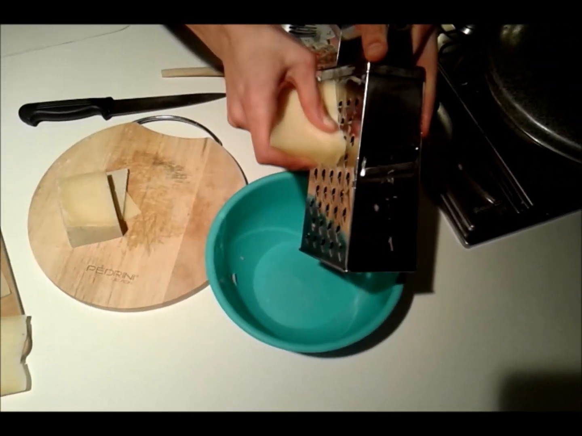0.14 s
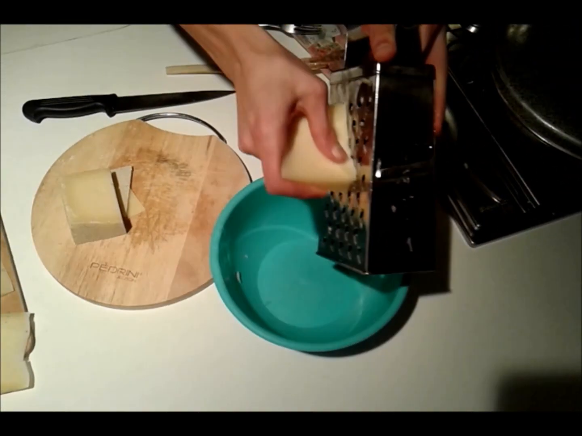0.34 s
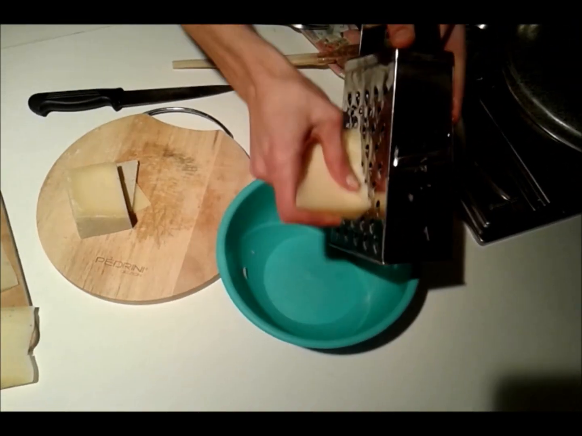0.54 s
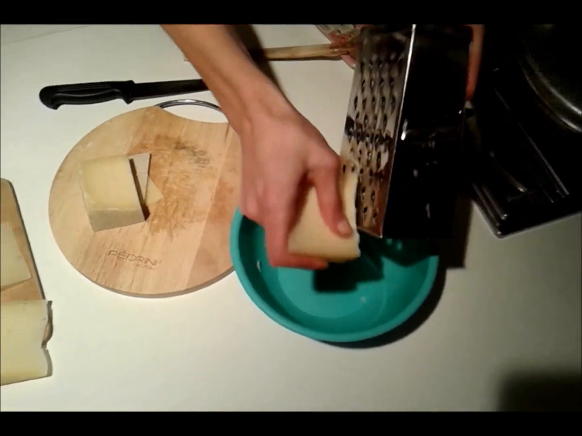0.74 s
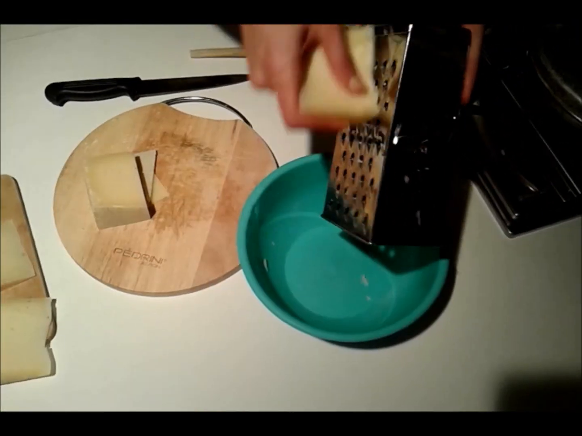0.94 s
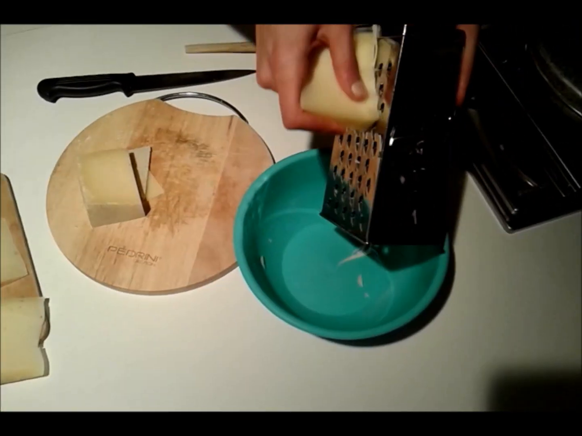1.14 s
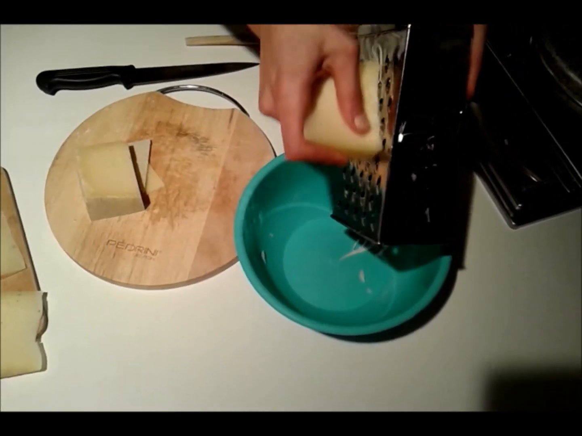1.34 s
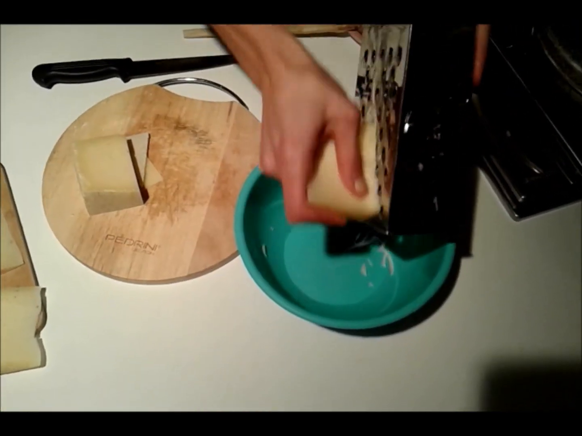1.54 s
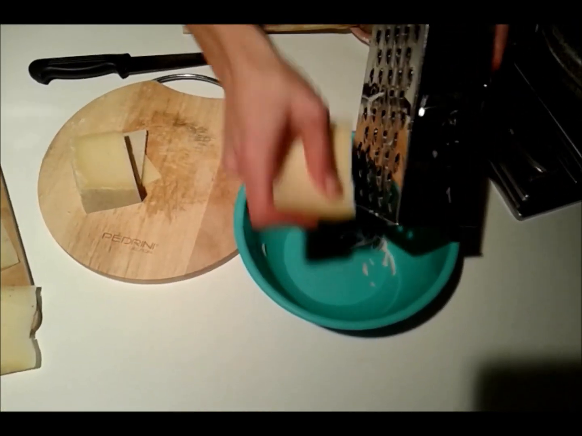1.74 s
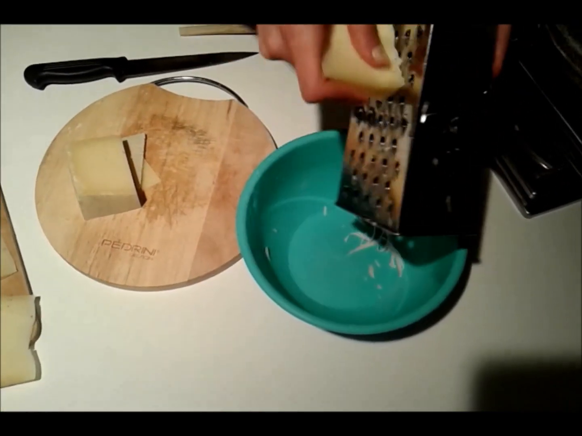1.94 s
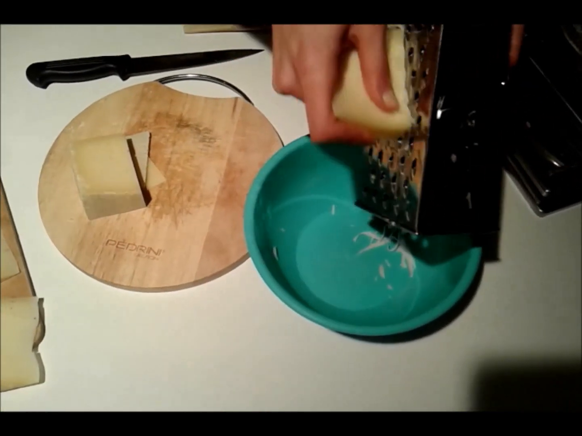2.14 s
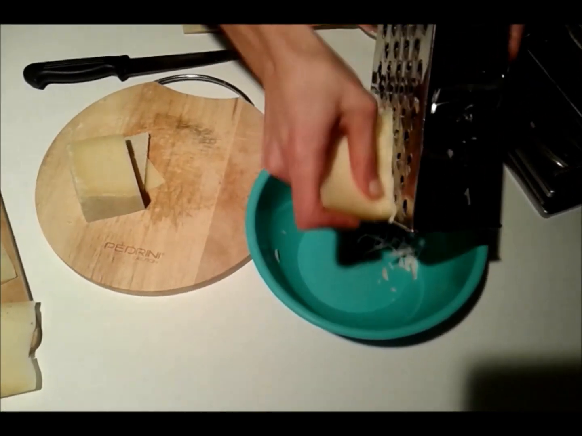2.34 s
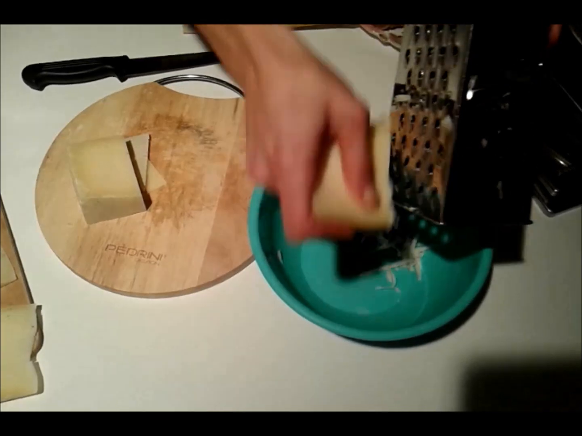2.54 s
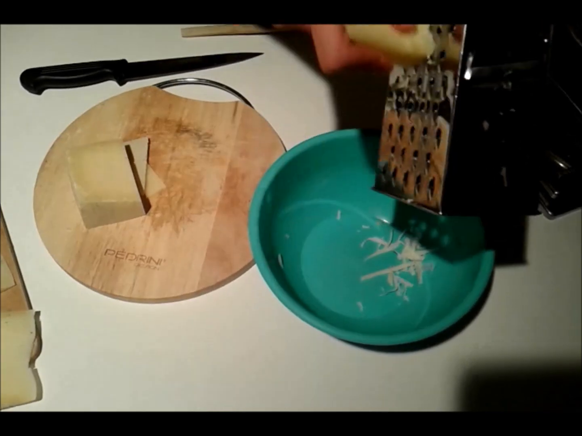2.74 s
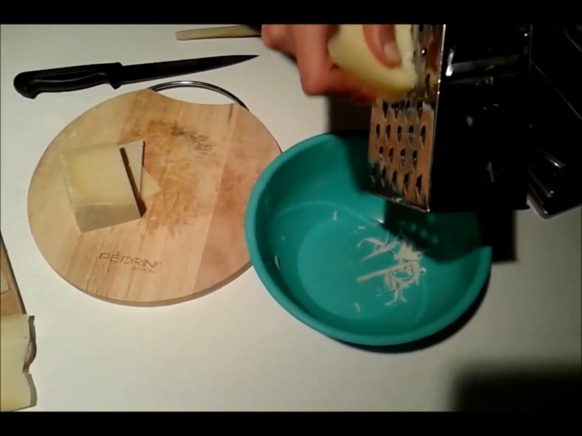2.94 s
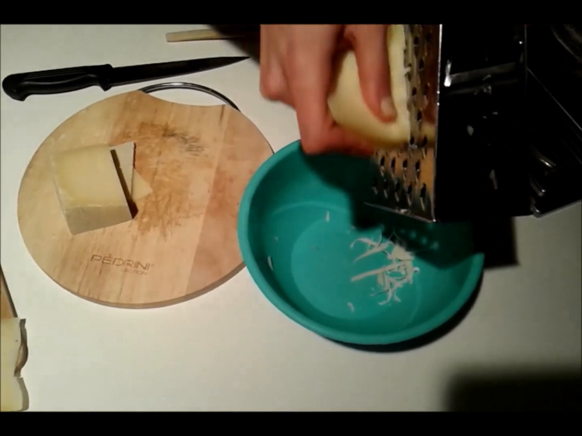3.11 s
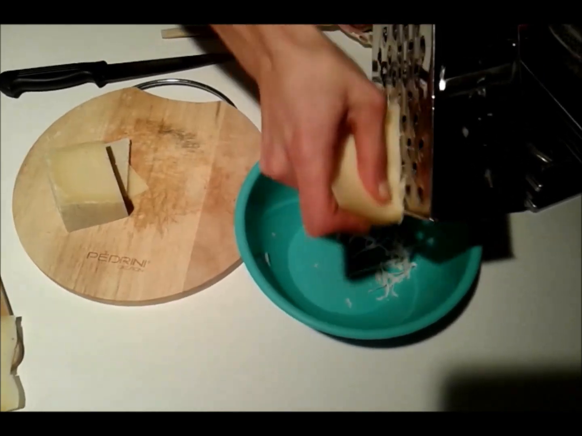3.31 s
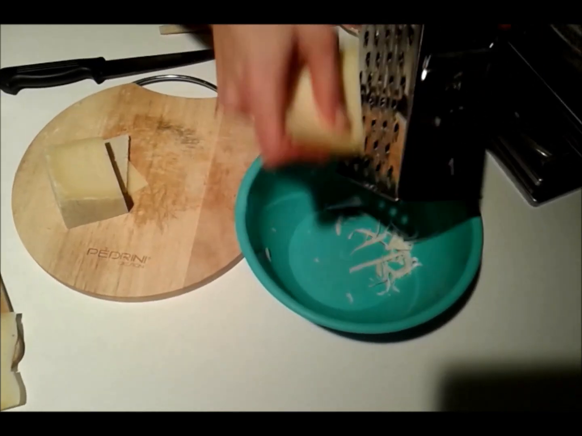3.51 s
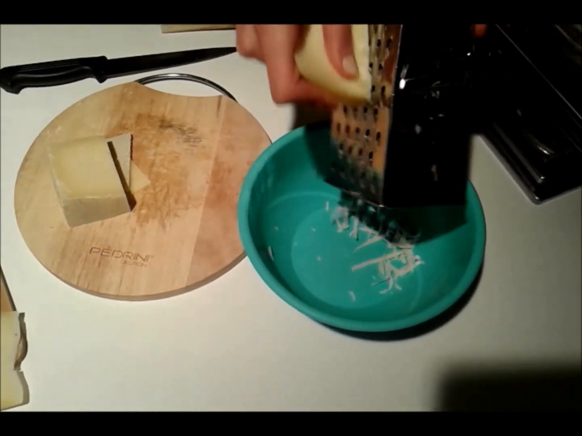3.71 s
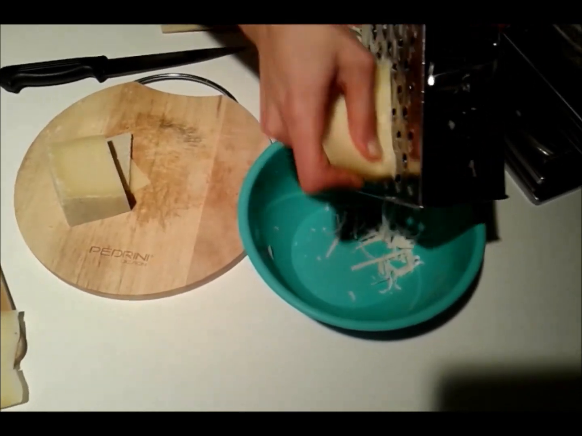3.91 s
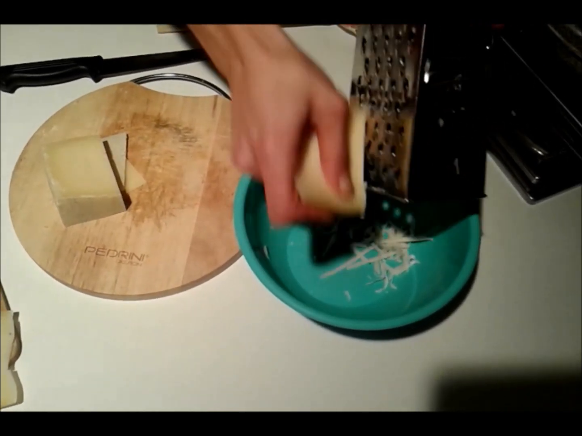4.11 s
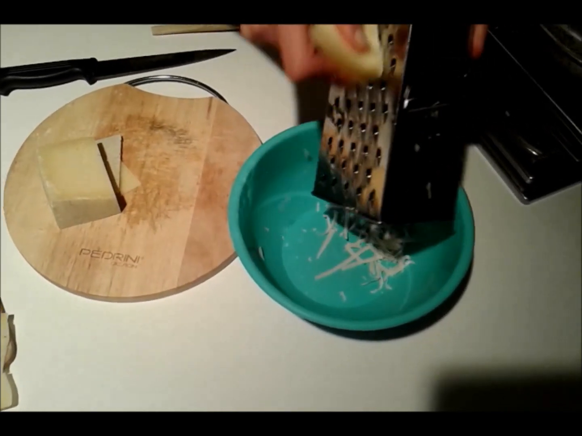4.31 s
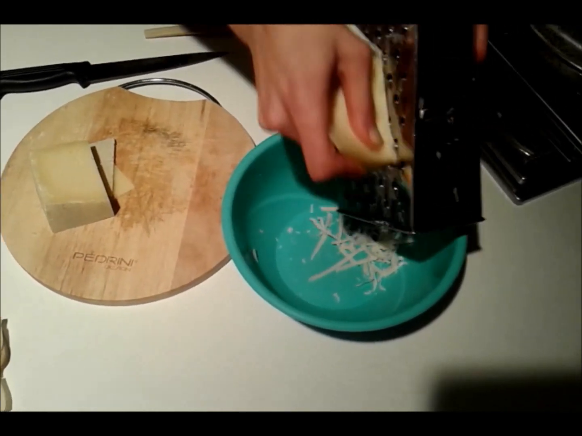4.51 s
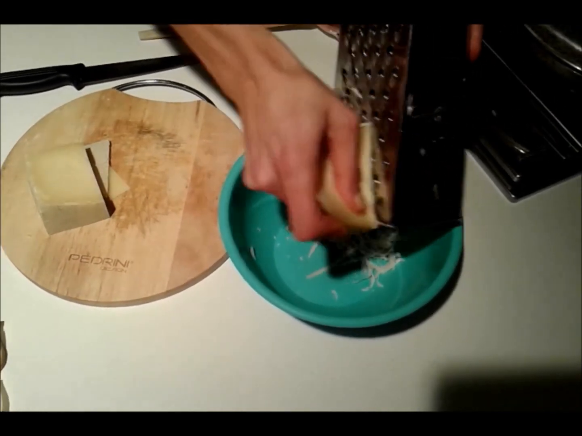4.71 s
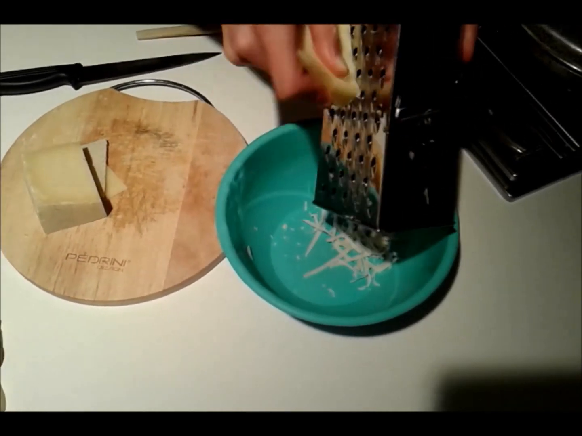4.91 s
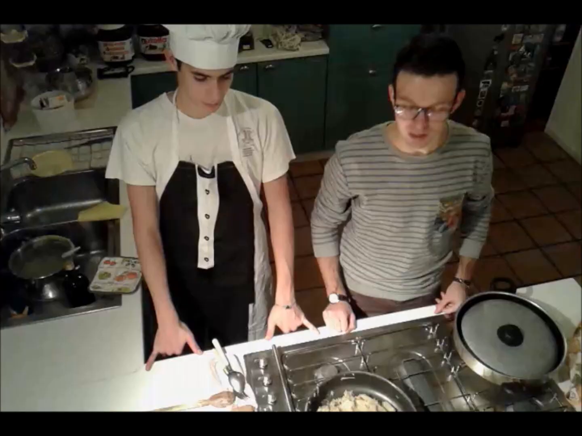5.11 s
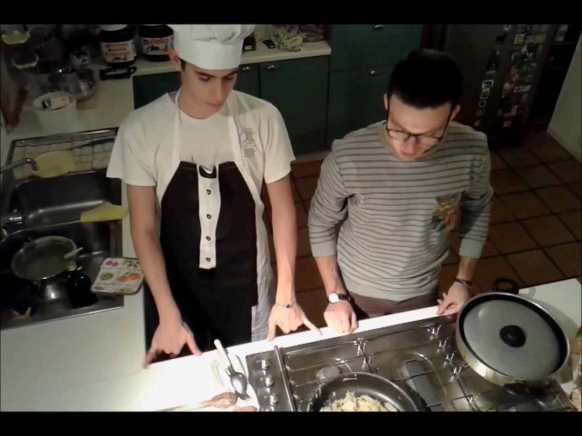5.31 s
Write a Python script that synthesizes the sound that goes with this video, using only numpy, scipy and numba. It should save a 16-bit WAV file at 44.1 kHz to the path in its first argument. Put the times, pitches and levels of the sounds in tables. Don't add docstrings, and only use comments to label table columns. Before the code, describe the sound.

A block of hard cheese is dragged down a steel box grater in short uneven strokes. Grainy scraping is broken by bright snaps and tiny clicks, while the hollow metal box knocks dully. Small hard-walled kitchen with faint hum; a close, thin, treble-heavy microphone gates the quiet gaps. The last stroke is dense, then sound cuts off.

```python
import sys
import numpy as np
from scipy import signal
from scipy.fft import rfft, irfft
from scipy.io import wavfile
from numba import njit

SR = 44100
rng = np.random.default_rng(int(sys.argv[2]) if len(sys.argv) > 2 else 0)


def boost_factor(decibels):
    exponent = np.asarray(decibels, float) / 20
    return 10 ** exponent


def int16_out(signal):
    q = np.round(np.clip(np.atleast_2d(signal).T, -1, 1) * 32767)
    wavfile.write(sys.argv[1], SR, q.astype(np.int16))


N = 240477


def colour(x, points):
    hz, db = np.transpose(points)
    bins_hz = np.fft.rfftfreq(8192, 1 / SR)
    log_gain = np.interp(np.log(bins_hz + 1), np.log(hz), db) * np.log(10) / 20
    cepstrum = irfft(log_gain)
    cepstrum[1:4096] *= 2
    cepstrum[4097:] = 0
    impulse = irfft(np.exp(rfft(cepstrum)))
    return signal.fftconvolve(x, impulse)[:len(x)]


def band(x, lo_hz, hi_hz):
    return signal.sosfilt(signal.butter(2, [lo_hz, hi_hz], "band", fs=SR, output="sos"), x)


def unit(x):
    return x / np.sqrt(np.mean(x ** 2))


def fade(t, t60):
    return boost_factor(-60 * t / t60)


def seconds(length_s):
    return np.arange(int(length_s * SR)) / SR


def add(out, s, x):
    i = int(s * SR)
    out[i:i + len(x)] += x[:N - i]


def grit(rate_hz, spread_db, smear_s):
    size = np.minimum(rng.exponential(size=N), 4)
    slips = (rng.random(N) < rate_hz / SR) * boost_factor(spread_db * size)
    power = signal.lfilter([1], [1, -np.exp(-1 / (smear_s * SR))], slips ** 2)
    return unit(rng.standard_normal(N) * np.sqrt(power))


# (frequency [Hz], density [dB per Hz])
HUM_TONE = [(15, -14.5), (30, -7.5), (70, -16), (160, -5), (220, -14), (300, -6), (480, -7), (640, -1.5),
            (790, -8), (930, -13), (1600, -19), (2700, -14), (3900, -17.5), (4700, -14), (8600, -10),
            (11000, -15), (15200, -16.5), (16500, -39.5)]


def kitchen():
    return boost_factor(-63.5) * unit(colour(rng.standard_normal(N), HUM_TONE))


def room(x):
    t = seconds(0.4)
    tail = rng.standard_normal(len(t)) * fade(t, 0.45) * (t > 0.004)
    tail = tail / np.sqrt(np.sum(tail ** 2))
    return boost_factor(-11) * signal.fftconvolve(x, tail)[:N]


# (time [s], frequency [Hz], level
# [dB], t60 [s])
LONE_RINGS = [(1.48, 150, -64, .2), (1.62, 150, -62, .2), (1.71, 295, -56, .2), (2.5, 390, -65, .5),
              (3.17, 300, -60, .2), (.7, 3800, -58, .15), (.13, 663, -57.5, .3), (.16, 660, -59, .5),
              (0.141, 330, -64, 0.49), (.02, 1930, -70, 1.5), (1.09, 520, -50, .35), (.86, 2140, -52, .2),
              (.29, 1430, -62, .1), (1.232, 2690, -44.5, .1), (1.232, 782, -48, .05),
              (4.802, 1352, -38.5, .08), (.49, 537, -49, 0.3), (0.683, 3220, -39.5, 0.078),
              (.684, 3700, -54, 0.051), (1.618, 1430, -40, 0.05), (2.064, 362.6, -36.5, 0.089),
              (2.441, 2850, -46, 0.051), (2.53, 1085, -42, 0.088), (2.549, 2870, -40.5, 0.024),
              (2.811, 3100, -47.5, 0.034), (3.703, 2200, -48, 0.055), (3.745, 533, -32, 0.13),
              (4.801, 1960, -45.5, 0.098), (5.013, 3200, -36, 0.05), (2.29, 1440, -56.5, 0.4),
              (4.385, 381, -39, 0.13), (5.02, 1085, -41.5, 0.16)]


def rings():
    t = seconds(0.6)
    out = np.zeros(N)
    for s, hz, db, t60 in LONE_RINGS:
        build_up = np.minimum(t / (0.078 * t60), 1)
        add(out, s, boost_factor(db) * np.sin(2 * np.pi * hz * t) * fade(t, t60) * build_up)
    return out


# (time [s], peak [dB], upper modes [dB re peak],
# low mode under the grip [Hz], upper mode under the grip [Hz])
BOX_KNOCKS = [(.498, -60, 8, 530, 1045), (.678, -58, 7, 502, 1407), (.806, -50.5, 4, 537, 1060),
              (.838, -37.5, 2.5, 548, 1065), (1.009, -50, -9, 633, 800), (1.072, -30.5, -5.5, 582, 1067),
              (1.23, -38.5, -19, 752, 790), (1.616, -45, 8, 512, 1430), (1.712, -43, -4, 577, 1410),
              (1.798, -39, -23, 780, 780), (2.066, -34, -8.5, 488, 1080), (2.289, -53.5, 7, 552, 1445),
              (2.37, -52, 5, 546, 1404), (2.857, -57, -16, 496, 1080), (3.336, -44, 8, 485, 1000),
              (3.483, -54, -4, 537, 1020), (3.732, -28.5, .3, 567, 927), (4.108, -51.5, -21.5, 480, 1460),
              (4.384, -30, -4, 528, 1100), (4.569, -50.5, -3, 490, 790), (4.677, -37, -2.5, 473, 1005),
              (4.803, -36, 4, 374, 1330), (4.886, -51, 2.5, 677, 1110), (5.019, -26.5, -2.5, 502, 1097)]
# (frequency [Hz], level [dB])
LOW_BODY = [(305, -7.5), (365, -9.5), (395, -3), (465, -6.5), (507, 2.5), (532, -0.5), (566, -1.5),
            (690, -1), (760, -1.5)]
# (frequency [Hz], level [dB])
HIGH_BODY = [(850, -1), (910, -9), (990, -5), (1075, 2), (1105, -12.5), (1260, -6.5), (1375, -4),
             (1464, -2.5), (1700, -5.5)]


def knocks():
    t = seconds(0.3)
    out = np.zeros(N)
    chance = rng.standard_normal((len(BOX_KNOCKS), 44))
    thud = unit(band(rng.standard_normal(N), 150, 2450))
    for (s, db, upper_db, grip_hz, upper_hz), draw in zip(BOX_KNOCKS, chance):
        t60 = 0.095 + 0.012 * max(-44 - db, 0)
        modes = [(grip_hz, 4), (upper_hz, upper_db + 4.5)] + LOW_BODY
        modes = modes + [(hz, level + upper_db) for hz, level in HIGH_BODY]
        ring = np.zeros(len(t))
        for (hz, level), level_draw, pitch_draw in zip(modes, draw[::2], draw[1::2]):
            tone = np.sin(2 * np.pi * hz * (1 + pitch_draw / 100) * t)
            ring += boost_factor(level + 2 * level_draw) * tone * fade(t, t60 * (550 / hz) ** 0.5)
        thud_here = np.roll(thud, -int(s * SR))[:len(t)]
        ring += boost_factor(-2.5) * thud_here * fade(t, 0.61 * t60)
        add(out, s, boost_factor(db - 10.5) * ring * np.minimum(t / 0.0044, 1))
    return out


# (time [s], peak [dB], centre [Hz], t60 [s])
CRUMBS = [(.8348, -34, 8000, .008), (1.2316, -26, 5000, .006), (1.6215, -11, 8400, .025),
          (1.627, -18, 8200, .015), (1.6433, -28, 8200, .008), (4.9222, -15, 8300, .012),
          (1.655, -29, 8200, .008), (4.9458, -23, 8200, .008), (3.3371, -16, 8300, .015),
          (1.707, -31, 7500, .015), (1.792, -31, 6500, .008), (1.7973, -23, 6000, .01),
          (1.803, -33, 2400, .02), (1.743, -42, 1650, .03), (2.3274, -31, 8200, .008),
          (2.3357, -30, 8200, .008), (2.4383, -36, 7500, .008), (2.4505, -43, 2900, .02),
          (2.6468, -38, 6500, .008), (2.647, -47, 1400, .07), (2.8882, -30, 3500, .012),
          (2.888, -48, 700, .08), (3.1742, -8, 8200, .02), (3.183, -17, 8200, .012),
          (3.2152, -28, 8200, .008), (2.6258, -37, 8500, .03), (3.2655, -26, 7500, .02),
          (2.2895, -14, 8200, .02), (3.348, -38, 2700, .06), (3.378, -40, 2700, .04),
          (3.917, -38, 850, .04), (3.9615, -28, 7000, .03), (4.2312, -27, 8000, .012),
          (4.232, -46, 850, .05), (4.498, -44, 3300, .04), (2.549, -37, 5500, .015), (4.68, -44, 2000, .06),
          (4.797, -43, 1500, .04), (4.813, -33, 1300, .05), (4.887, -40, 850, .02),
          (4.8991, -29, 8000, .01), (4.922, -36, 800, .05), (5.0128, -28, 600, .04),
          (5.0155, -33, 3100, .03), (5.0162, -28, 8000, .01), (5.046, -37, 550, .06),
          (1.084, -38, 560, .05), (2.05, -48, 400, .05), (2.098, -47, 380, .08), (1.6172, -13, 8500, .015)]


def chips():
    t = seconds(0.1)
    out = np.zeros(N)
    for s, db, hz, t60 in CRUMBS:
        noise = rng.standard_normal(len(t))
        burst = band(noise * fade(t, t60), hz / 1.2, hz * 1.2)
        burst = band(burst, hz / 1.3, hz * 1.3)
        add(out, s, boost_factor(db) * burst / np.max(np.abs(burst)))
    return out


# (time [s], peak [dB], thin hiss above 11 kHz [dB re peak])
FLICKS = [(0.5064, -18, -37), (1.2318, -13, -50), (1.5134, -37, -32), (1.6172, -12, -36),
          (2.2904, -14, -17), (2.6254, -30, -10), (2.993, -36, -28), (3.1742, -10, -36), (3.3373, -8, -38),
          (3.619, -23, -35), (3.6778, -28.5, -25), (3.7038, -27, -33), (3.718, -29, -30),
          (3.7323, -26, -24), (3.7563, -17, -37), (3.7647, -31, -27), (3.776, -26, -32), (3.7814, -37, -30),
          (3.8588, -27, -32), (3.8711, -19, -31), (3.8822, -28, -29), (3.8924, -29, -31),
          (3.8974, -28, -29), (3.926, -25, -21), (3.9589, -23, -9), (4.2312, -22, -36), (4.4975, -34, -33),
          (4.9216, -20, -26), (4.9452, -18, -32), (5.0301, -15.5, -38)]
# (frequency [Hz], density [dB per Hz])
TEETH_TONE = [(880, -40), (1500, -21.5), (1930, -25.5), (2130, -21), (3380, -15), (4610, -13.5),
              (5750, -4.5), (6360, -5.5), (7300, -2.5), (8200, 3.5), (8900, 2.5), (9800, -10), (11400, -21),
              (15200, -24), (16000, -26), (16500, -67)]


def ticks():
    t = seconds(0.06)
    click, hiss = np.zeros((2, N))
    for s, db, hiss_db in FLICKS:
        noise = rng.standard_normal(len(t))
        burst = noise * fade(t, 0.0039)
        add(click, s, boost_factor(db + 10) * burst / np.sqrt(np.sum(burst ** 2)))
        add(hiss, s, boost_factor(db + hiss_db - 4) * noise * fade(t, 0.05))
    return colour(click, TEETH_TONE) + band(hiss, 10500, 17000)


# (time [s], peak [dB], mid [dB re peak], low [dB re peak], t60 [s])
STRONG_TEARS = [(.495, -28, -21, -45, .14), (.7949, -30.5, -17, -42, .14), (.8562, -24, -18, -27, .11),
                (1.2318, -30, 6, -9, .074), (1.5112, -27, -14, -43, .043), (1.6165, -12, -20.5, -49, .13),
                (1.7773, -21.5, -31, -20, .073), (1.7964, -27, 0, -9.5, .064),
                (2.2886, -11, -38, -36.5, .1), (2.8893, -30.5, 7, -22, .044),
                (2.993, -29.5, -16.5, -26, .082), (3.1738, -7, -46.5, -37, .1), (3.2648, -24, -13, -42, .1),
                (3.3369, -19, -4, -15.5, .058), (3.9136, -31.5, -1.5, -3, .088),
                (3.9584, -25, -18, -20, .13), (4.2306, -30.5, -4, -18, .1), (4.8845, -30, -16, -21, .05),
                (4.8965, -29, -10.5, -8.5, .13), (4.9212, -17, -10, -19.5, .11),
                (4.9455, -30, -25.5, -44, .09), (5.0123, -21, -1.5, 3, .074),
                (5.0908, -26, -14, -13.5, .14), (5.1188, -28, -11, -13, .2)]
# (time [s], peak [dB], mid [dB re peak], t60 [s])
SMALL_NICKS = [(.683, -32.5, -11, .29), (1.2177, -50, .3, .1), (1.4784, -37.5, -11, .19),
               (1.566, -36.5, -14, .23), (1.601, -39.5, -9, .079), (1.921, -40, -6.5, .12),
               (2.4381, -34.5, .3, .12), (2.501, -35.5, -25, .25), (2.5478, -40, 2.5, .042),
               (2.6254, -47, -14, .11), (2.6466, -38, -12, .13), (2.7324, -44.5, -17, .11),
               (2.7412, -33.5, -27, .091), (2.8123, -54, 8.5, .16), (2.8504, -32.5, -14.5, .13),
               (3.053, -38.5, -12, .17), (3.1672, -34, -16, .049), (3.3687, -32.5, -4, .15),
               (3.482, -33, -16, .18), (3.6734, -42.5, -16, .2), (3.702, -41, 4.5, .13),
               (4.206, -41, -8, .14), (4.2594, -41.5, -24, .11), (4.3273, -39, -13, .17),
               (4.38, -50, 2.5, .11), (4.4747, -37, -22, .17), (4.6544, -34, -15, .099),
               (4.676, -35, -6.5, .1), (4.7591, -31.5, -15, .1)]


def snaps():
    t = seconds(0.3)
    shake = np.zeros((3, N))
    nicks = [(s, db, mid_db, mid_db - 9, t60) for s, db, mid_db, t60 in SMALL_NICKS]
    for s, db, mid_db, low_db, t60 in STRONG_TEARS + nicks:
        rise_s = 0.0011 + 0.00015 * max(low_db + 15, 0)
        shape = fade(t, 0.25 * t60) + boost_factor(-9.5) * fade(t, t60)
        shape = shape * np.minimum(t / rise_s, 1)
        for row, rel_db in zip(shake, (0, mid_db, low_db)):
            add(row, s, shape * boost_factor(db + rel_db))
    slips = grit(5000, 1.5, 0.0008)
    top = unit(colour(slips, TEETH_TONE))
    mid = unit(band(band(slips, 2100, 4800), 1900, 5200))
    low = unit(band(slips, 700, 2040))
    return boost_factor(-9) * shake[0] * top + boost_factor(-8) * shake[1] * mid + boost_factor(-4.5) * shake[2] * low


def pressure(s, db, swell_s, die_s):
    t = np.arange(0, N, 32) / SR
    lag = t - s[:, None]
    fall = np.where(lag < 0, -lag / swell_s[:, None], lag / die_s[:, None])
    power = np.sum(boost_factor(2 * db)[:, None] * 10 ** (-2 * fall), axis=0)
    return np.interp(np.arange(N) / SR, t, np.sqrt(power))


# (time of most pressure [s], level [dB], swell over 20 dB [s], die over 20 dB [s])
SKIM_SPELLS = [(0., -48.5, .01, .05), (.13, -52, .13, .22), (.695, -50.5, .05, .11), (.774, -49, .006, .2),
               (.856, -43, .14, .035), (1.055, -53, .01, .13), (1.236, -45.5, .015, .06),
               (1.385, -54, .02, .07), (1.494, -46.5, .034, .076), (1.635, -37, .022, .17),
               (1.797, -45, .065, .07), (1.97, -60, .15, .04), (2.136, -62, .085, .17),
               (2.315, -40, .02, .245), (2.547, -46.5, .06, .034), (2.64, -57, .012, .11),
               (2.738, -59, .027, .13), (2.898, -52.5, .15, .05), (3.19, -41, .025, .2),
               (3.338, -46, .01, .14), (3.494, -47, .05, .037), (3.618, -48, .008, .03),
               (3.754, -51, .12, .085), (3.826, -53.5, .01, .5), (4.158, -48, .2, .04),
               (4.24, -56, .05, .25), (4.498, -45.5, .036, .13), (4.68, -46.5, .02, .35),
               (5.03, -45.5, .05, .36), (5.094, -42, .027, .14)]
# (time of most pressure [s],
# sheet rasp [dB], box rumble [dB], swell over 20 dB [s], die over 20 dB [s])
COARSE_SPELLS = [(.12, -66, -70, .12, .3), (.505, -51, -59, .016, .04), (.688, -50.5, -58.5, .008, .07),
                 (.862, -46.5, -49, .14, .08), (1.06, -59, -51, .02, .17), (1.236, -47, -55, .012, .07),
                 (1.494, -58, -57.5, .05, .3), (1.635, -48.5, -53, .06, .3), (1.797, -47, -55, .04, .13),
                 (2.068, -58, -53, .015, .05), (2.31, -58, -57, .02, .8), (2.547, -51, -55, .07, .06),
                 (2.652, -53, -57, .006, .06), (3.338, -44, -58, .006, .09), (3.494, -51.5, -60, .06, .09),
                 (3.76, -52.5, -44, .05, .1), (3.972, -59, -50, .3, .15), (4.17, -59, -56, .25, .12),
                 (4.39, -63, -58, .04, .05), (4.498, -55.5, -63, .04, .13), (4.68, -55.5, -53.5, .008, .6),
                 (4.919, -46.5, -48, .09, .12), (5.048, -43, -39, .05, .04), (5.094, -50, -50, .02, .2),
                 (.585, -72, -63, .05, .12),
    (.675, -62, -70, .03, .02),
    (2.055, -64, -58, .015, .03),
    (2.12, -72, -62, .03, .25),
    (3.005, -62, -68, .01, .05),
    (3.27, -56, -59, .03, .07),
    (3.62, -59, -66, .01, .12),
]


def scrape():
    s, rasp_db, box_db, swell_s, die_s = np.transpose(COARSE_SPELLS)
    fine = colour(grit(2500, 2.8, 0.0008), TEETH_TONE)
    coarse = grit(1200, 2.5, 0.001)
    rasp = band(coarse, 1200, 5600)
    box = sum(boost_factor(db) * band(coarse, hz - 25, hz + 18) for hz, db in LOW_BODY + HIGH_BODY)
    box = unit(box) + boost_factor(6.5) * unit(band(coarse, 270, 2000))
    out = unit(fine) * pressure(*np.transpose(SKIM_SPELLS))
    out += unit(rasp) * pressure(s, rasp_db, swell_s, die_s)
    return out + unit(box) * pressure(s, box_db, swell_s, die_s)


def scene():
    near = rings() + knocks() + chips() + ticks() + snaps() + scrape()
    return band(kitchen() + room(near) + near, 30, 20000)[None]


@njit
def follow(x, attack, release):
    out, e = np.empty(len(x)), 0.
    for i in range(len(x)):
        e += (abs(x[i]) - e) * (attack if abs(x[i]) > e else release)
        out[i] = e
    return out


def top_cut(x):
    return signal.sosfilt(signal.butter(12, 16810, fs=SR, output="sos"), x)


def record(dry):
    level = follow(dry[0], 1 / (0.0013 * SR), 1 / (0.013 * SR))
    ahead = np.roll(level, -int(0.0043 * SR))
    gate = np.minimum(np.maximum(level, ahead) / boost_factor(-42.5) + 0.0013, 1) ** 0.51
    end = np.clip((5.166 - np.arange(N) / SR) / 0.002, 0, 1)
    mic = signal.sosfilt(signal.ellip(6, 0.5, 34, 15800, fs=SR, output="sos"), dry)
    return top_cut(mic * gate * end)


dry = scene()
out = record(dry)
int16_out(out)
```